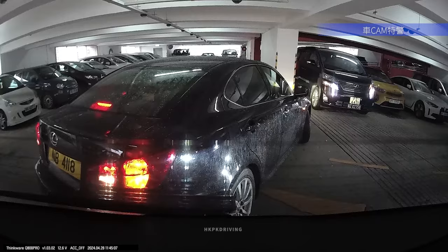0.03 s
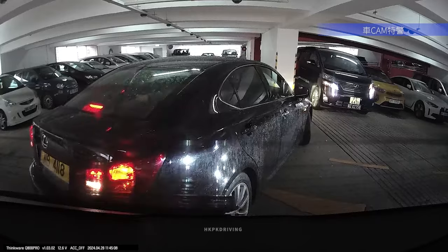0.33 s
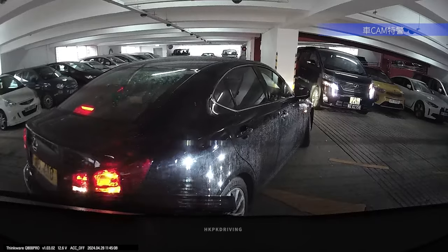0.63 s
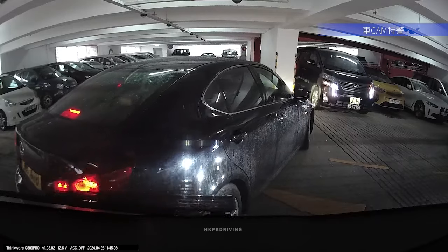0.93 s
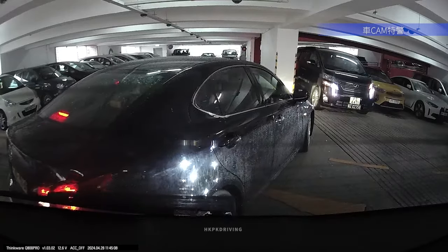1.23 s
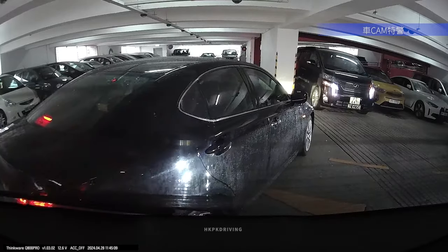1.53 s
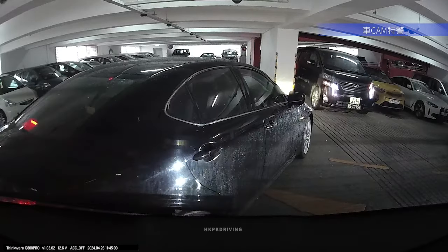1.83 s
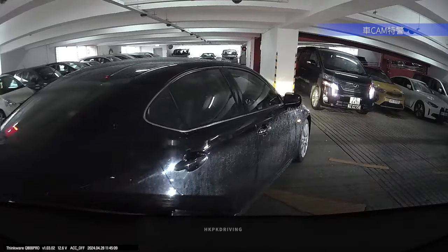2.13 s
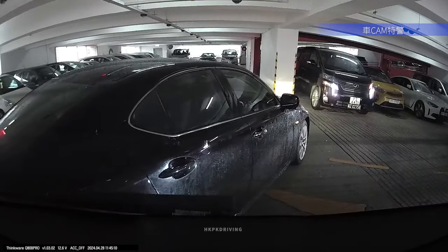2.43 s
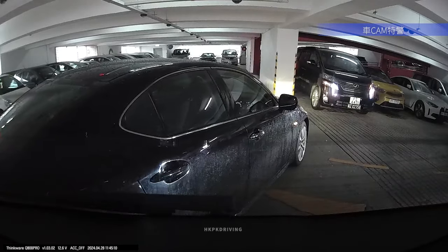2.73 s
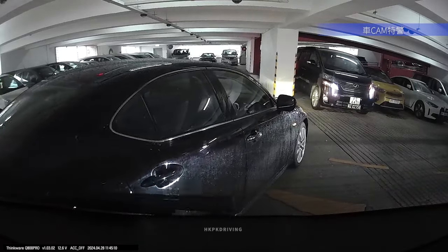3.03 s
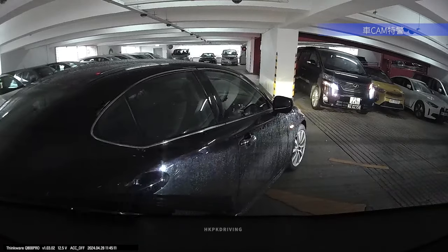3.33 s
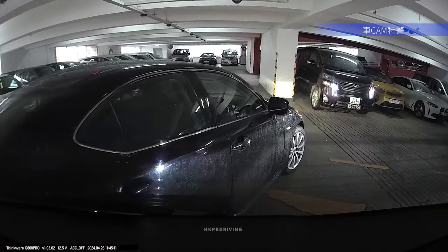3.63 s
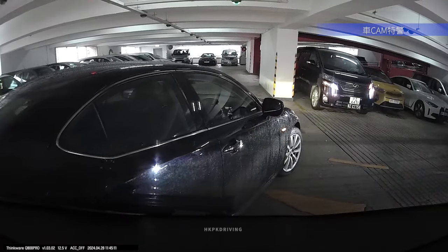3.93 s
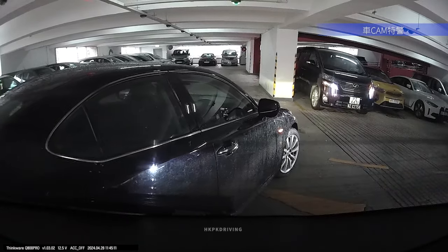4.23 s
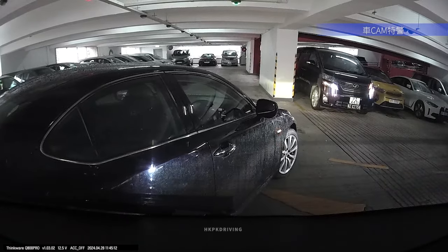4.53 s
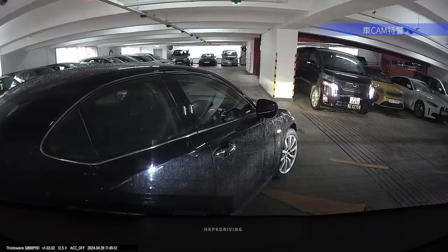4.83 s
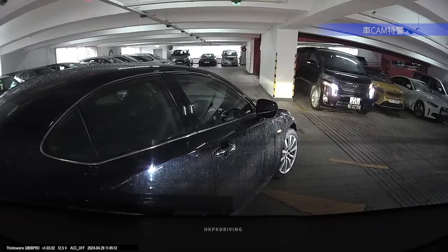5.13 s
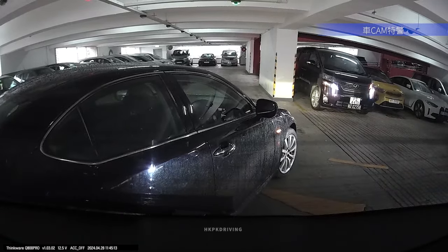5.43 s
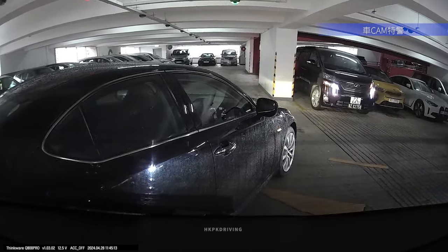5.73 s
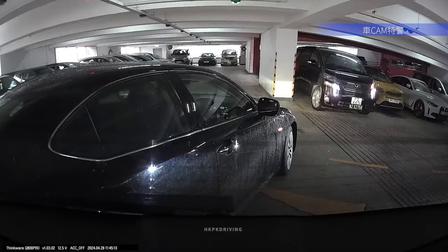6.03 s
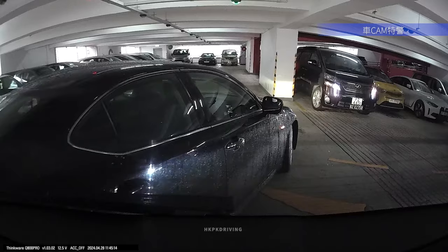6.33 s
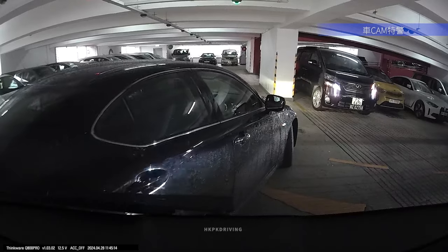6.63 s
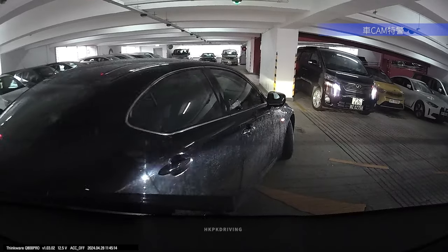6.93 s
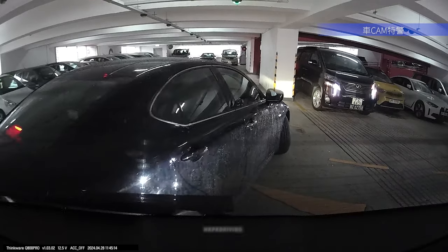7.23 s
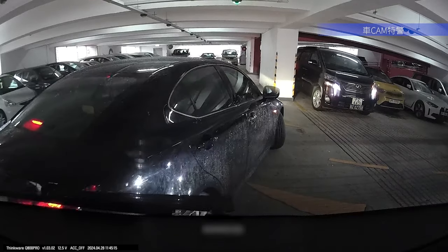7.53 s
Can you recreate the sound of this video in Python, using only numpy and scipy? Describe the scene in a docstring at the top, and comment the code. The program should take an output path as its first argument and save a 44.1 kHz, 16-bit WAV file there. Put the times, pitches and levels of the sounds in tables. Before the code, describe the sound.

From the start, a low, throbbing engine rumble swells and eases, heard from behind a car's closed windscreen over dull parking garage ventilation. A faint, thin electronic whine flutters rapidly high above it, with a little hiss, all the way through. The engine eases off around 3 seconds. At about 3.4 seconds one car nudges another: body panels give dull knocks, the shell booms softly, and plastic trim creaks, most clearly near 3.6 seconds. The hardest knock lands at about 4.1 seconds, followed by smaller knocks, a low thump and short creaks until about 4.7 seconds. Light, scattered knocks return between 5.2 and 6.4 seconds, with a last faint creak near 6.6 seconds. The engine rumble and the whine carry on until the end, at nearly 8 seconds.

```python
"""A car creeps through a parking garage and nudges another one, heard from behind its windscreen.
From the start the engine rumbles through the cabin over dull garage noise, and a camera's electronics
add a thin whine that flips between two states fifteen times a second. At about 3.4 seconds comes the
nudge: body panels knock, plastic trim creaks and the car's shell booms. The hardest knock lands near
4.1 seconds. Lighter knocks and creaks follow until about 6.7 seconds, and the engine runs on."""
import sys
import numpy as np
from scipy import signal
from scipy.fft import rfft, irfft, next_fast_len
from scipy.io import wavfile
from scipy.ndimage import uniform_filter1d

SR = 44100
rng = np.random.default_rng(int(sys.argv[2]) if len(sys.argv) > 2 else 0)


def dump_mix(stems):
    """Bounce the given channels to the path in sys.argv[1] as a 16-bit WAV at rate SR."""
    frames = np.atleast_2d(stems).T  # one column per channel
    limited = np.clip(frames, -1, 1)  # hard clip at full scale
    pcm = np.round(limited * 32767).astype(np.int16)
    wavfile.write(sys.argv[1], SR, pcm)


N = 343098
TIME = np.arange(N) / SR
HIT_TIME = TIME[:SR // 2]  # each knock, creak or boom gets half a second

# How hard the engine works. Each row: time in seconds, firing rate in Hz, relative level in dB.
ENGINE_EFFORT = [(0, 70, -37), (1.2, 69.5, -30), (1.55, 70, -39), (1.85, 73.5, -27.5), (2.6, 73, -28.5),
                 (3.25, 69.5, -44), (3.95, 79.5, -31.5), (4.4, 78.5, -32), (4.85, 74.7, -29.5),
                 (5.65, 72, -33.5), (5.9, 77.5, -28), (7.0, 78, -27.5), (7.78, 72.5, -32.5)]
# The slow shaking of the idling engine. Each row: pitch in Hz, relative level in dB.
IDLE_SHAKE = [(24, -27.5), (36, -28), (43, -34)]
# How shake and rumble swell together. Each row: time in seconds, boost or cut in dB.
SHUDDER_SWELL = [(0, -0.5), (.7, -1.5), (.97, 3), (1.58, -4), (2.05, 3), (2.6, -6), (2.85, -1), (4.7, 1),
                 (5.3, -1.5), (5.95, 2), (6.45, 0), (7.78, 2.5)]

# The tone colour of five sounds. Each row: frequency in Hz, relative level in dB.
RUMBLE_SPECTRUM = [(10, -7.5), (20, -14), (28, -3.5), (35, -7), (44, -2.5), (52, -11.5), (68, -12.5),
                   (90, -14), (115, -22), (150, -24.5), (300, -70)]
RATTLE_SPECTRUM = [(60, -4), (130, 8), (230, 0), (330, 2), (480, -3.5), (680, -5), (950, -15.5),
                   (1150, -21.5), (1850, -41), (3300, -39), (5000, -53)]
TRIM_SPECTRUM = [(150, -29), (320, 1), (700, 4), (1100, -4.5), (1500, -4.5), (1900, -1), (2300, -9.5),
                 (2900, -6), (3600, -20.5), (5000, -19.5), (7500, -28)]
GARAGE_SPECTRUM = [(60, 6), (110, -4.5), (170, 4.5), (245, -1.5), (310, -1), (560, -6.5), (950, -11.5),
                   (1200, -18.5), (1450, -22), (1880, -16.5), (2200, -25), (2700, -22.5), (3700, -31.5),
                   (9000, -54)]
HISS_SPECTRUM = [(1000, 0), (5000, 2.5), (8200, 1), (8900, 4), (10000, 0.5), (12200, 4.5), (13700, 7.5),
                 (14600, 10.5), (15300, -6)]

# The notes at which body panels and plastic trim ring.
# Each row: pitch in Hz, relative level in dB, fade time in seconds (the time to drop by 60 dB).
PANEL_NOTES = [(128, -21, 0.3), (181.7, -47, .14), (303, -3, 0.075), (317, 3.5, 0.17), (388, -3.5, 0.11),
               (524, -13.5, 0.2), (667, -12, 0.15), (716, -17, 0.16), (916, -12, 0.087), (990, -19, 0.13)]
TRIM_NOTES = [(313, -3, 0.23), (404, 4, 0.054), (500, -9, 0.05), (674, 8.5, 0.075), (730, -8, 0.027),
              (948, 7.5, 0.052), (1240, -14, 0.026), (1590, -5, 0.036), (1760, 0, 0.09), (1875, 1.5, 0.06),
              (2170, -20, .035), (2730, -5, 0.023), (3230, -6, 0.025)]
# Knocks on the panels. Each row: start in seconds, level in dB, build-up in seconds,
# rattle fade time in seconds, treble cut-off in Hz, rattle level against the ringing in dB.
PANEL_KNOCKS = [(3.433, -26, 0.0072, 0.35, 2200, 15), (3.465, -38, 0.0046, 0.16, 1500, 1),
                (3.505, -43, 0.0044, 0.15, 2500, 1), (3.625, -28.5, 0.0046, 0.2, 500, -13),
                (3.765, -25.5, 0.0037, 1, 204, 9), (4.094, -12, 0.0084, 0.072, 950, -9.5),
                (4.111, -18.5, 0.004, 0.27, 2460, 5), (4.291, -30, 0.0056, 0.77, 1520, 10),
                (4.390, -34.5, 0.0031, 0.39, 700, 6), (5.23, -33, 0.027, 0.52, 400, 16),
                (5.579, -32.5, 0.0013, 0.053, 2530, 18), (5.88, -37, 0.0071, 0.21, 902, 3.5),
                (6.208, -36, 0.0035, 0.2, 700, -1), (6.262, -31, 0.012, 0.2, 2500, 3),
                (6.372, -35, 0.0018, 0.11, 600, 0)]
# Creaks of the trim. Each row: start in seconds, relative level in dB, slip length in seconds,
# treble cut-off in Hz, dashboard level against the trim in dB.
TRIM_CREAKS = [(3.440, -42, 0.033, 7000, 4), (3.505, -46.5, 0.018, 5000, 1),
               (3.6137, -25, 0.017, 3970, -21), (3.717, -35, 0.014, 14000, -3.5),
               (4.110, -44, 0.015, 3010, -5), (4.298, -40.5, 0.052, 5500, -3),
               (4.355, -50, 0.13, 3003, -16), (4.724, -47, .015, 4000, 4.5),
               (5.580, -58, 0.0081, 1998, 14.5), (6.59, -49, 0.067, 6060, -8)]
# Booms of the shell. Each row: start in seconds, pitch in Hz, relative level in dB, fade time in seconds.
SHELL_BOOMS = [(3.442, 67, -10.5, 0.085), (3.46, 106, -14, 0.15), (3.503, 170, -19, 0.083),
               (3.523, 38.7, 0, 0.093), (3.613, 37.4, -4.5, 0.23), (3.766, 96, -14.5, 0.38),
               (4.108, 117, -19, .2), (4.305, 60.6, -16, 0.33), (4.308, 109, -21, .14)]

# The whine of the camera's power supply. Each row: pitch in Hz, pitch wander in Hz, level in dB.
EARLY_WHINE = [(6528, 54, -53.5), (13100, 110, -57.5), (13400, 260, -59.5)]  # first part of each work cycle
LATE_WHINE = [(6080, 14.4, -57), (5760, 110, -62.5)]  # second part
HIGH_WHISTLE = [(11350, 69.6, -53.5)]  # from the end of the first part to the end of the cycle
LOADED_WHINE = [(5850, 101, -51.5), (9500, 120, -63.5), (11660, 80, -54)]  # under heavier load
# Spells of heavier load, when the whine jumps. Each row: start in seconds, length in seconds.
LOAD_SPELLS = [(1.055, 0.011), (1.092, 0.031), (1.29, 0.043), (2.897, 0.039), (4.488, .042), (4.587, 0.021),
               (4.63, 0.013), (6.487, 0.046)]
# Steady tones from the camera's electronic clock. Each row: pitch in Hz, level in dB.
CLOCK_TONES = [(5000, -78), (9000, -75), (14000, -85)]


def gain(db):
    """Turn decibels into a number to multiply by."""
    return 10 ** (np.asarray(db) / 20)


def unit(x):
    """Scale a sound so that its average strength (rms) is 1."""
    return x / np.sqrt(np.mean(x ** 2))


def burst(x):
    """Scale a sound so that its loudest short stretch has strength 1."""
    return x / np.sqrt(uniform_filter1d(x ** 2, size=600).max())


def curves(table):
    """Join a table's rows with straight lines in time, giving one curve per value column."""
    seconds, *columns = np.transpose(table)
    return [np.interp(TIME, seconds, column) for column in columns]


def colour(x, spectrum):
    """Give a sound the tone colour of a spectrum table."""
    hz, db = np.transpose(spectrum)
    n = next_fast_len(2 * len(x), True) // 2 * 2
    log_hz = np.log(np.arange(n // 2 + 1) * SR / n + 1)
    log_gain = np.log(gain(np.interp(log_hz, np.log(hz), db)))
    cepstrum = irfft(log_gain)  # folded below, so the filter never rings before a hit
    cepstrum[1:n // 2] *= 2
    cepstrum[n // 2 + 1:] = 0
    return irfft(rfft(x, n) * np.exp(rfft(cepstrum)))[:len(x)]


def soften(x, hz):
    """Turn down the treble above hz."""
    return signal.sosfilt(signal.butter(2, min(hz, SR / 3), fs=SR, output="sos"), x)


def wander(rate):
    """A smooth random wobble of typical size 1 that takes `rate` turns a second."""
    step = max(int(SR / rate), 2)
    stairs = np.repeat(rng.standard_normal(N // step + 1), step)
    return unit(uniform_filter1d(stairs, step)[:N])


def tone(hz):
    """A pure tone of strength 1 that follows a moving pitch."""
    return np.sin(2 * np.pi * np.cumsum(hz) / SR) * np.sqrt(2)


def fade(fade_s):
    """A curve that drops by 60 dB in fade_s seconds."""
    return np.exp(-np.log(1000) * HIT_TIME / fade_s)


def ring(notes):
    """A struck part rings at its own notes, each dying away."""
    return sum(gain(db) * fade(fade_s) * np.sin(2 * np.pi * hz * HIT_TIME) for hz, db, fade_s in notes)


def add(out, start, x):
    """Mix x into out at a start time in seconds."""
    i = int(start * SR)
    out[i:i + len(x)] += x[:N - i]


def engine(firing_db=-2, overtone_db=-16, rumble_db=-27, throb_db=2, unsteady_db=2):
    """The engine's throbbing firing tone, idle shake and rough rumble come through the car's body."""
    firing_hz, effort_db = curves(ENGINE_EFFORT)
    firing_hz = uniform_filter1d(firing_hz, size=8000)  # the flywheel evens out the speed
    shudder_db, = curves(SHUDDER_SWELL)
    throb = gain(effort_db + throb_db * wander(11))
    firing = gain(firing_db) * tone(firing_hz + wander(16))
    overtone = gain(overtone_db) * tone(firing_hz * 3 / 2)
    shake = sum(gain(db + unsteady_db * wander(2.2)) * tone(hz + 0.795 * wander(3.4))
                for hz, db in IDLE_SHAKE)
    rumble = gain(rumble_db) * unit(colour(rng.standard_normal(N), RUMBLE_SPECTRUM))
    return throb * (firing + overtone) + gain(shudder_db) * (shake + rumble)


def panel_knocks():
    """The contact gives a little, so the panels' ringing builds up; loose parts rattle along."""
    out = np.zeros(N)
    for start, db, rise_s, fade_s, cutoff_hz, rattle_db in PANEL_KNOCKS:
        push = 1 - np.exp(-(HIT_TIME / rise_s) ** 2)
        rattle = colour(rng.standard_normal(len(HIT_TIME)) * fade(fade_s) * push, RATTLE_SPECTRUM)
        hit = burst(ring(PANEL_NOTES) * push) + gain(rattle_db) * burst(rattle)
        add(out, start, gain(db) * burst(soften(hit, cutoff_hz)))
    return out


def slip_clicks(length_s, slips_per_s=1300, scatter_db=2, count=200):
    """Plastic sticks and slips in a quick, uneven run of clicks that grows with the load, then dies."""
    gaps = rng.uniform(0.4, 1.6, count)
    times = (np.cumsum(gaps) - gaps[0]) / slips_per_s
    sizes = gain(scatter_db * rng.standard_normal(count)) * rng.choice([-1, 1], count)
    load = 1 - np.exp(-(times + 1 / slips_per_s) / (0.23 * length_s))
    release = np.exp(-(times / length_s) ** 4)
    clicks = np.zeros(len(HIT_TIME))
    samples = np.minimum((times * SR).astype(int), len(clicks) - 1)
    np.add.at(clicks, samples, sizes * load * release)
    return clicks


def trim_creaks(ringing_db=-4, cabin_db=-13, cabin_fade_s=0.097, dashboard_hz=700):
    """Slips make the plastic trim ring; the cabin smears them and the dashboard adds body."""
    out = np.zeros(N)
    for start, db, length_s, cutoff_hz, dashboard_db in TRIM_CREAKS:
        clicks = slip_clicks(length_s)
        swell = 1 - np.exp(-HIT_TIME / length_s)
        smear = rng.standard_normal(len(HIT_TIME)) * fade(cabin_fade_s) * swell
        force = burst(clicks) + gain(cabin_db) * burst(smear)
        ringing = signal.fftconvolve(force, ring(TRIM_NOTES))[:len(HIT_TIME)]
        trim = burst(colour(force, TRIM_SPECTRUM)) + gain(ringing_db) * burst(ringing)
        dashboard = gain(dashboard_db) * burst(soften(trim, dashboard_hz))
        add(out, start, gain(db) * (burst(soften(trim, cutoff_hz)) + dashboard))
    return out


def shell_booms(rise_s=0.008):
    """Each shove flexes the car's shell for a few slow swings."""
    out = np.zeros(N)
    push = 1 - np.exp(-HIT_TIME / rise_s)
    for start, hz, db, fade_s in SHELL_BOOMS:
        add(out, start, ring([(hz, db, fade_s)]) * push)
    return out


def garage_noise(level_db=-39.5, flutter_db=0.1):
    """Steady ventilation and engine noise, dulled by the closed windows."""
    level = gain(level_db + flutter_db * wander(9))
    return level * unit(colour(rng.standard_normal(N), GARAGE_SPECTRUM))


def supply_whine(tones, flicker_db=1):
    """The power supply's tones flicker in level, while their pitch jitters fast and drifts a little."""
    out = np.zeros(N)
    for hz, wander_hz, db in tones:
        level = gain(db + flicker_db * wander(150))
        jitter, drift = wander(1300), 0.3 * wander(60)
        out += level * tone(hz + wander_hz * (jitter + drift))
    return out


def electronics(cycle_hz=15, hiss_db=-54):
    """The camera's power supply changes pitch with its work cycle, over clock tones and hiss."""
    phase = TIME * cycle_hz % 1  # runs from 0 to 1 in each cycle
    early_start, early_end, late_end = 0.02, 0.38, 0.946
    loaded = np.any([(TIME > start) & (TIME < start + length) for start, length in LOAD_SPELLS], axis=0)
    early = (phase > early_start) & (phase < early_end)
    rest = (phase > early_end) & ~loaded
    late = rest & (phase < late_end)
    states = [(early, EARLY_WHINE), (late, LATE_WHINE), (rest, HIGH_WHISTLE), (loaded, LOADED_WHINE)]
    # each switch is smoothed over 2 milliseconds so that it does not click
    whine = sum(uniform_filter1d(1.0 * on, size=90) * supply_whine(tones) for on, tones in states)
    clock = sum(gain(db) * tone(np.full(N, hz)) for hz, db in CLOCK_TONES)
    hiss = gain(hiss_db) * unit(colour(rng.standard_normal(N), HISS_SPECTRUM))
    return whine + clock + hiss


def scene():
    """All the sounds meet in one channel behind the windscreen."""
    return (engine() + garage_noise() + panel_knocks() + trim_creaks() + shell_booms() + electronics())[None]


def record(dry):
    """The camera sharply cuts the treble above 15250 Hz."""
    return signal.sosfilt(signal.ellip(10, 0.2, 80, 15250, fs=SR, output="sos"), dry)


dry = scene()
out = record(dry)
dump_mix(out)
```